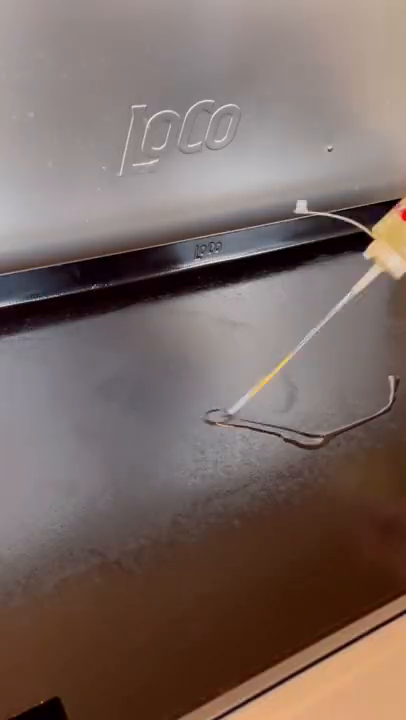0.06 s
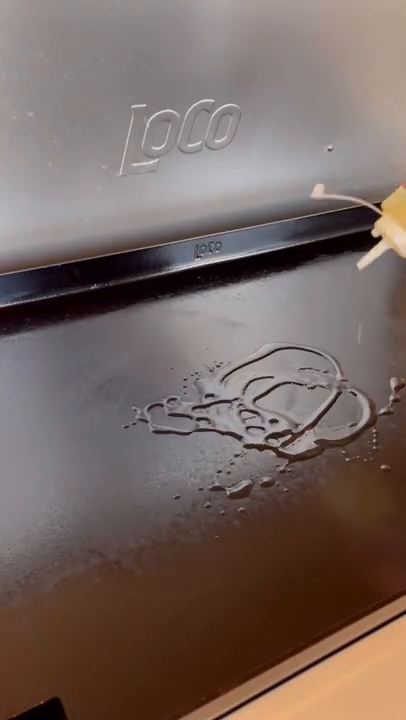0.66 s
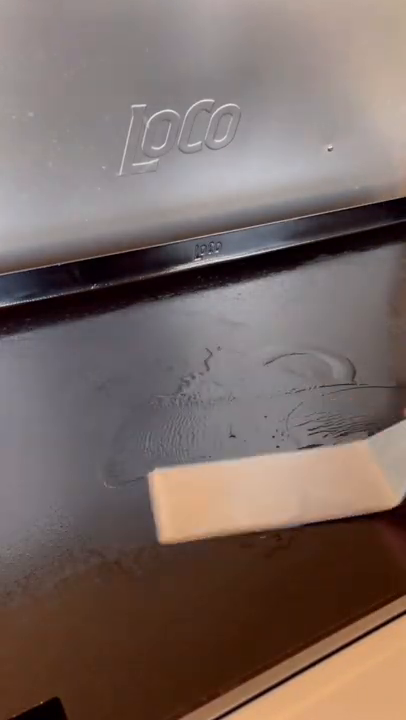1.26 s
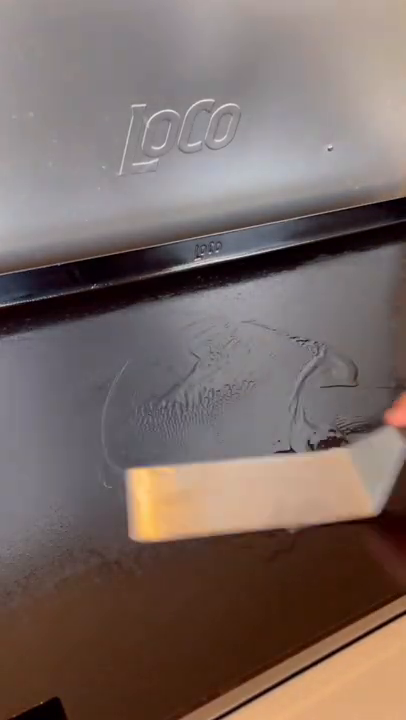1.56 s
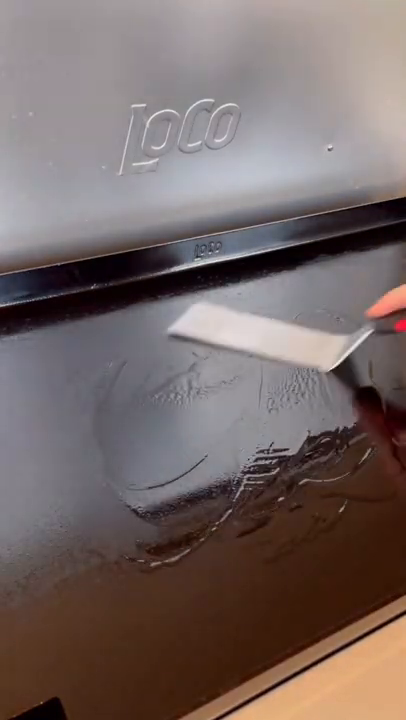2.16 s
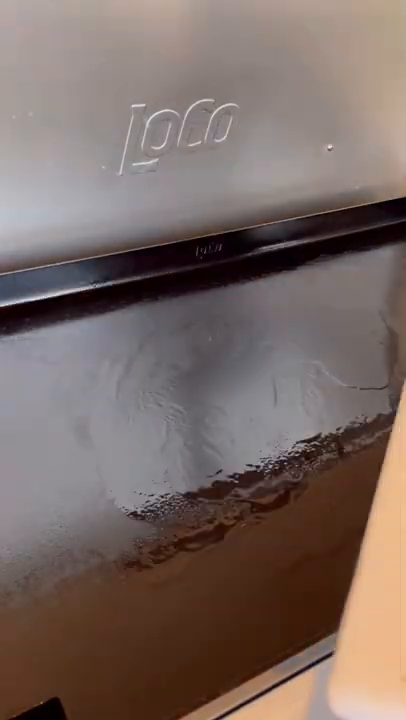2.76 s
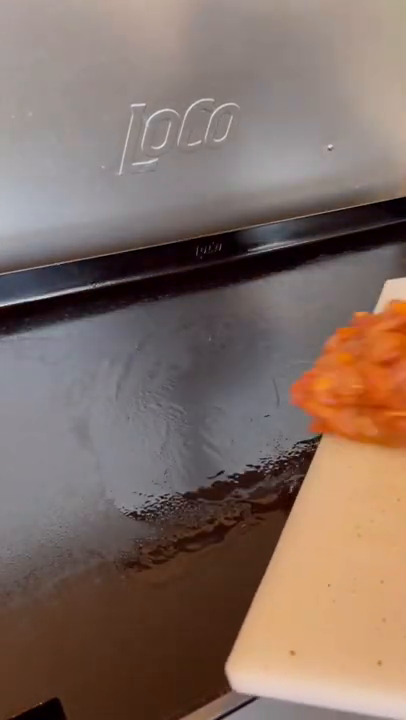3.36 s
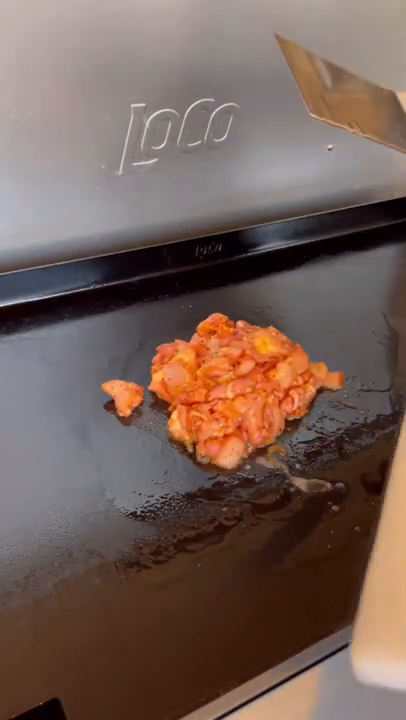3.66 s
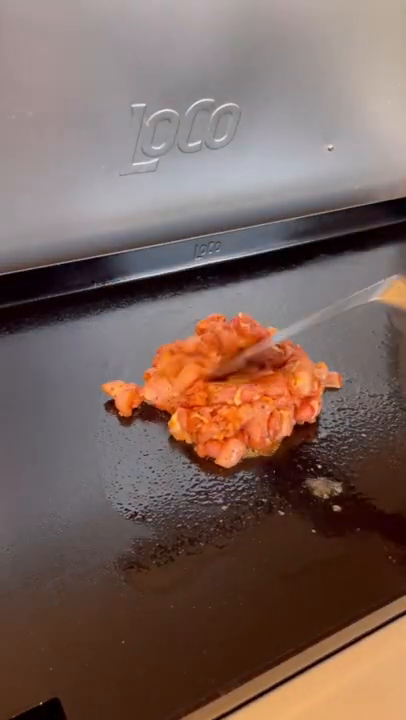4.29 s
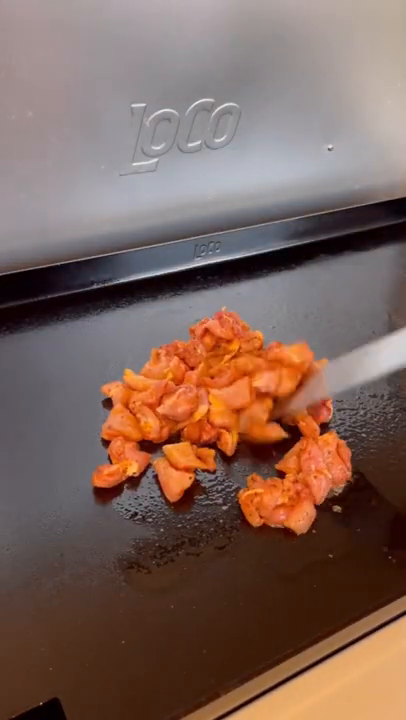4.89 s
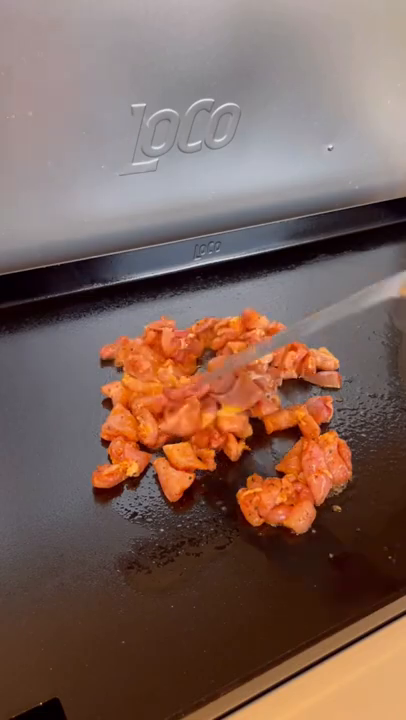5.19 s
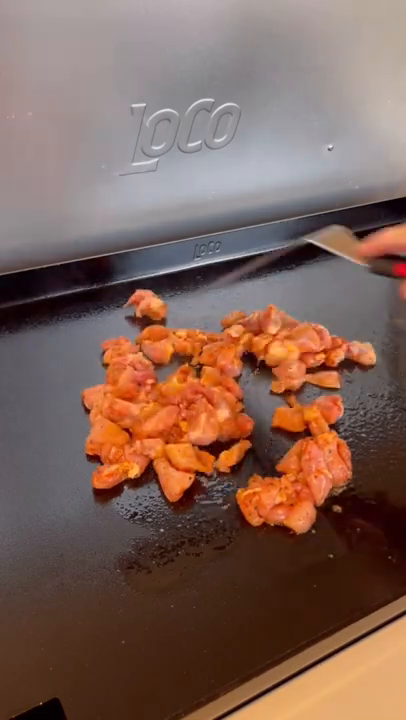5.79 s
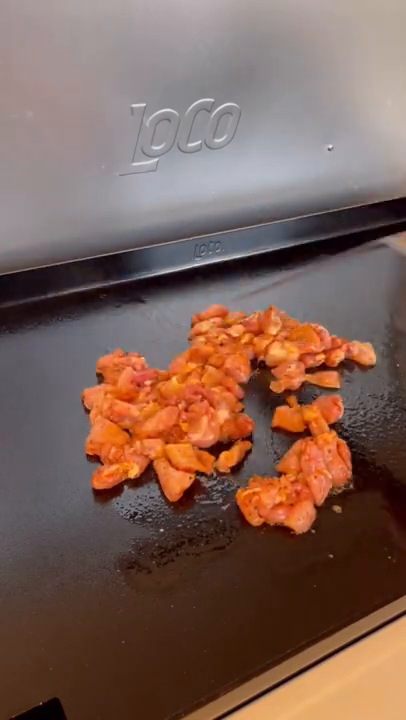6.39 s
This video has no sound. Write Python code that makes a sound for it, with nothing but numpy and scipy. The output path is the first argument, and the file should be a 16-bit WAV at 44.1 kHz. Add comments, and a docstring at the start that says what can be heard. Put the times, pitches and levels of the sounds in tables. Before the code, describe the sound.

The sound is close, at an outdoor steel griddle, with a faint low rumble of air and a distant engine droning until about 2.7 seconds. A squeeze bottle spits at around 0.6 seconds, followed by tiny bubble pops. At 1.1 seconds a metal spatula lands and spreads the oil in rasping, ringing strokes, strongest near 1.3, 1.6, 2.0 and 2.4 seconds. The ringing stops at 2.7 with a dull bump. A scraper taps a plastic cutting board around 3.0 and drags meat across it, ending in a slight squeal and a clink. At 3.5 seconds the chicken meets the hot steel in a loud flare of sizzling, with soft flops as pieces fall. From 4 seconds it settles into a steady, bright, crackling hiss. The scraper chops and clinks against the plate near 4.9, 5.9 and 6.2 seconds, and steam spurts briefly at 5.5. The sizzle eases slightly at the end.

```python
"""Chicken sizzling on an outdoor steel griddle, heard close up on a two-port stereo microphone.
First, with an engine droning far off, a squeeze bottle spits oil and a spatula spreads it in ringing strokes.
The meat is pushed off a cutting board and flares as it meets the steel, then hisses steadily
with bursting steam bubbles while a steel scraper knocks it apart."""
import sys
import numpy as np
from scipy import signal
from scipy.fft import rfft, irfft
from scipy.io import wavfile
from scipy.ndimage import uniform_filter1d

SR = 44100
rng = np.random.default_rng(int(sys.argv[2]) if len(sys.argv) > 2 else 0)


def output_pcm(signal):
    """Save a mono or channel-first signal as 16-bit PCM at the path in sys.argv[1].

    Samples are clipped to [-1, 1] before scaling.
    """
    pcm = np.clip(np.atleast_2d(signal).T, -1, 1) * 32767
    wavfile.write(sys.argv[1], SR, np.round(pcm).astype(np.int16))


N = 284004

FLARE_START_S, FLARE_END_S = 3.445, 3.977  # the heap of meat lands on the steel
# the scraper's edge taps the board: (time [s], board level [dB], blade level [dB], decay [s])
BOARD_TAPS = [(2.9203, -41, -63, 0.0033), (3.002, -27.5, -22.5, 0.0064), (3.295, -29.5, -34, 0.0034),
              (3.4314, -39, -17, 0.012)]


def amp(db):
    """Decibels to gain."""
    return 10 ** (np.asarray(db) / 20)


def unit_rms(x):
    """Scales to rms 1."""
    return x / np.sqrt(np.mean(x ** 2) + 1e-20)


def curve_at(points, hz):
    """Reads a table on a log-frequency axis."""
    f, value = np.transpose(points)
    return np.interp(np.log(hz + 1), np.log(f + 1), value)


def level(rows):
    """Smoothed gain from rows of (time [s], level [dB]), silent outside them."""
    rows, gain = np.array(rows), np.zeros(N)
    span = np.arange(max(int(rows[0, 0] * SR), 0), min(int(rows[-1, 0] * SR), N))
    gain[span] = amp(np.interp(span / SR, rows[:, 0], rows[:, -1]))
    return abs(uniform_filter1d(gain, size=90))


def drift(hz):
    """A random wander of rms 1, mostly slower than hz."""
    knots = np.arange(N) * (2 * hz / SR)
    values = rng.standard_normal(2 ** 13)
    return unit_rms(np.interp(knots, np.arange(len(values)), values))


def grains(per_s, spread_db):
    """Two independent trains of tiny random clicks of unequal size."""
    size, hit = rng.standard_normal((2, N)), rng.random((2, N)) < per_s / SR
    size[hit] *= amp(spread_db * np.minimum(rng.exponential(1, (2, N))[hit], 5))
    return unit_rms(size * hit)


def blows(rows, rise_s):
    """Each contact is a dying burst of chatter: rows of (time [s], level [dB], decay [s])."""
    t, power = np.arange(N) / SR, np.zeros(N)
    for s, db, decay in rows:
        first = round(s * SR)
        age = t[:SR // 2][:N - first]
        burst = amp(db) * (1 - np.exp(-age / rise_s)) * np.exp(-age / decay)
        power[first:first + len(age)] += burst ** 2
    return np.sqrt(power) * rng.choice([-1, 1], (2, N))


def swell(s, rise_s, hold_s, fade_db_per_s, turn_db=0):
    """Attack, hold and release of one contact, peak 1; it may slacken in the middle of the hold."""
    gain, first = np.zeros(N), round(s * SR)
    age = np.arange(min(SR, N - first)) / SR
    held = age - rise_s
    slack = np.sin(np.pi * np.clip(held / hold_s, 0, 1)) ** 2
    release_db = fade_db_per_s * np.maximum(held - hold_s, 0)
    gain[first:first + len(age)] = np.minimum(age / rise_s, 1) * amp(turn_db * slack - release_db)
    return gain


def convolve(x, taps):
    """Passes both channels through a response scaled to unit energy."""
    return signal.fftconvolve(np.float32(x), np.float32(taps / np.linalg.norm(taps[0])), axes=1)[:, :N]


def body(x, spectrum, modes=(), between_db=0):
    """Causal filter of unit energy: a broad colour, with resonances above the level between them."""
    hz = abs(np.fft.fftfreq(2 ** 14, 1 / SR))
    peaks = sum(amp(db) ** 2 / (1 + (2 * (hz - f) / width) ** 2) for f, width, db in modes)
    low_cut = (hz ** 2 / (hz ** 2 + (spectrum[0][0] / 2) ** 2)) ** 2
    gain = amp(curve_at(spectrum, hz)) * np.sqrt(amp(between_db) ** 2 + peaks) * low_cut + 1e-5
    minimum_phase = np.exp(signal.hilbert(np.log(gain)).conj())
    taps = np.fft.ifft(minimum_phase).real[:2 ** 13]
    return convolve(x, taps[None])


def ring(x, t60):
    """The crowd of modes of a steel sheet: a dense dying tail."""
    t = np.arange(SR // 2) / SR
    return convolve(x, rng.standard_normal((2, len(t))) * amp(-60 * t / t60))


def open_air():
    """The low rumble of the outdoors, sinking partway through."""
    # colour of the air: (frequency [Hz], level [dB])
    colour = [(30, -28.5), (50, -18), (80, -5.5), (170, -3), (260, -7), (400, -18.5), (700, -23),
              (1300, -27), (2500, -38), (4000, -42), (6000, -54.5), (15000, -58.5)]
    sink_start_s, sink_length_s = 2.27, 1.65
    sunk = np.clip((np.arange(N) / SR - sink_start_s) / sink_length_s, 0, 1)
    return body(rng.standard_normal((2, N)), colour) * amp(-50 - 11 * sunk)


def drone(orders, span_s, shaft_hz, sag_hz_per_s, db, fade_db_per_s, waver_db, dulling_db_per_s=0):
    """Only a few shaft orders carry this far, each wavering on the way; speed and level sag slowly."""
    start, end = span_s
    age = np.clip(np.arange(N) / SR - start, 0, end - start)
    turns = np.cumsum(shaft_hz - sag_hz_per_s * age) / SR
    tone = np.zeros(N)
    for order, order_db in orders:
        dulling_db = dulling_db_per_s * (order - orders[0][0]) * age  # higher orders fade faster
        gain = amp(order_db + waver_db * drift(8.1) - dulling_db)
        tone += gain * np.sin(2 * np.pi * (order * turns + rng.random()))
    return level([(start, db), (end, db - fade_db_per_s * (end - start))]) * tone


def far_engine():
    """A distant engine drones: one set of partials at first, a higher set from 0.93 s; near the end a hum
    swells and rises."""
    # partials at each speed: (shaft order, level [dB])
    slow_orders = [(2.5, -5.5), (4, 2), (5.5, -27), (6.5, -3.5), (16, -19.5)]
    fast_orders = [(4, 0), (6, -16), (7, -1.5)]
    # the brief hum: (time [s], half-width [s], pitch [Hz], rise [Hz/s], level [dB])
    hum_swell = (2.365, .06, 274, 180, -39)
    slow = drone(slow_orders, span_s=(0, .93), shaft_hz=31.86, sag_hz_per_s=0.38,
                 db=-44, fade_db_per_s=.5, waver_db=1.0)
    fast = drone(fast_orders, span_s=(.93, 2.7), shaft_hz=41.1, sag_hz_per_s=1.063,
                 db=-41.5, fade_db_per_s=2, waver_db=1.7, dulling_db_per_s=1)
    s, width, hz, rise, db = hum_swell
    t = np.arange(N) / SR - s
    hum = amp(db) * np.exp(-(t / width) ** 2) * np.sin(2 * np.pi * (hz + rise * t / 2) * t)
    return slow + fast + hum


def oil_bottle():
    """The emptying bottle spits air, and small bubbles pop with a rising pitch."""
    # spits of air: (time [s], level [dB], decay [s])
    spits = [(.122, -56, .005), (.24, -54.5, 0.0073), (.586, -43, 0.0084), (.621, -46, 0.005),
             (.6415, -18, 0.0048)]
    # their colour: (frequency [Hz], level [dB])
    spit_colour = [(400, -6.5), (700, -15), (1100, 3.5), (1700, -11), (2500, -14), (3700, -8),
                   (6000, -32.5), (9500, -6), (13000, -45), (15500, -19)]
    # bubbles at the nozzle: (time [s], level [dB], pitch [Hz])
    bubbles = [(0.564, -39, 4450), (0.726, -31, 2080), (0.8108, -41, 3630), (0.869, -45, 3450)]
    out = amp(-2) * body(blows(spits, rise_s=0.00024), spit_colour)
    t = np.arange(SR // 30) / SR
    for s, db, hz in bubbles:
        pop = amp(db + 3.5) * (1 - np.exp(-t / 0.00026)) * np.exp(-t / 0.0013)
        chirp = np.sin(2 * np.pi * hz * t * (1 + 7 * t))
        splash = 0.16 * signal.lfilter([.5], [1, -.7], rng.standard_normal(len(t)))
        out[:, round(s * SR):][:, :len(t)] += pop * (chirp + splash)
    return out + amp(-7.5) * ring(out, t60=0.14)


def board_slide():
    """The scraper drags meat over the plastic board, its edge squealing towards the end."""
    # the push: (time [s], friction [dB])
    push = [(2.93, -54), (3.2, -56), (3.29, -45), (3.34, -33.5), (3.44, -41.5), (3.48, -70)]
    # colour of the slide: (frequency [Hz], level [dB])
    colour = [(200, -0.5), (400, -5), (800, 0), (1700, -4), (2500, -3), (3500, -2), (5000, -5),
              (6500, -11.5), (10000, -10.5), (15500, -12.5)]
    # resonances of the board and the edge: (frequency [Hz], width [Hz], level [dB])
    board_modes = [(868, 36, 2.5), (1354, 70, 1), (1727, 56, 3), (3300, 100, -7), (3840, 74, 0.5),
                   (4060, 54, -11), (5340, 52, -3)]
    edge_modes = [(4780, 50, -1), (5030, 50, 1)]
    squeal_peak_s, squeal_width_s = 3.405, .1
    drag = unit_rms(grains(per_s=5100, spread_db=1) * amp(3.2 * drift(60))) * level(push)
    taps = blows([(s, db, decay) for s, db, _, decay in BOARD_TAPS], rise_s=0.0004)
    slide = amp(2.5) * body(drag + taps, colour, board_modes, between_db=-6.5)
    skid = amp(2) * np.exp(-((np.arange(N) / SR - squeal_peak_s) / squeal_width_s) ** 2)
    squeal = body(drag * skid, [(2500, -28), (5000, -6), (9000, -11)], edge_modes, between_db=-40)
    return slide + squeal


def board_bumps():
    """The board and the table bump dully and jostle."""
    # bumps: (time [s], level [dB], decay [s])
    thuds = [(2.704, -14.5, 0.0048), (2.807, -34, 0.015), (2.999, -23, 0.043), (6.174, -26, 0.014)]
    # spells of soft jostling: (time [s], hold [s], level [dB])
    jostles = [(2.945, 0.2, -38.5), (5.183, 0.17, -46.5), (6.128, 0.074, -40.5)]
    # low colour of both: (frequency [Hz], level [dB])
    low_colour = [(30, -21), (55, -16), (90, 2), (170, 3), (260, -7.5), (400, -15), (700, -28)]
    spells = sum(amp(db) * swell(s, rise_s=0.0094, hold_s=hold, fade_db_per_s=450)
                 for s, hold, db in jostles)
    jostle = spells * unit_rms(rng.standard_normal((2, N)) * amp(3.7 * drift(45)))
    return amp(-3.5) * body(blows(thuds, rise_s=0.00041) + jostle, low_colour + [(1300, -27), (6000, -58)])


def falling_meat():
    """Pieces flop onto the steel, with smaller ones tumbling in between."""
    # the larger pieces: (time [s], level [dB], decay [s])
    slaps = [(3.649, -30.5, 0.013), (3.792, -28.5, 0.0071), (3.891, -27.5, 0.0076), (3.919, -31.5, 0.011),
             (4.057, -34.5, 0.016), (4.699, -40.5, .018)]
    # colour of a slap: (frequency [Hz], level [dB])
    colour = [(90, 0), (160, 6.5), (260, -3), (480, -5.5), (800, -13.5), (3000, -27)]
    patter = grains(per_s=49, spread_db=2.5) * level([(FLARE_START_S, -51), (FLARE_END_S, -51)])
    return amp(-0.5) * body(blows(slaps, rise_s=0.00065) + patter, colour)


def scraper():
    """Chops through the meat ring the loaded plate low down, while the thin blade clinks above."""
    # chops and skids: (time [s], plate level [dB], blade level [dB], decay [s])
    strikes = [(4.7, -37.5, -33, 0.032), (4.85, -24, -20, 0.027), (5.105, -39.5, -26, .025),
               (5.888, -25.5, -17.5, 0.026), (5.925, -31, -16, .02), (6.196, -26, -17, 0.019),
               (6.231, -39, -13, 0.014)]
    # colours of plate and blade: (frequency [Hz], level [dB])
    chop_colour = [(100, -11), (220, -3.5), (1000, 7), (1900, 2), (2900, 1), (4500, -33), (9000, -54)]
    clink_colour = [(500, -20), (1500, -0.5), (3400, 1), (6000, 0.5), (11000, 5.5), (15500, 13.5)]
    # their modes: (frequency [Hz], width [Hz], level [dB])
    loaded_plate_modes = [(221, 50, 3), (479, 30, 4), (705, 30, -10), (905, 30, -2), (972, 30, -2),
                          (1030, 30, -4), (1690, 40, -3), (1790, 50, -2), (1884, 28, 7.5), (2730, 160, -3),
                          (2850, 30, 1)]
    blade_modes = [(2850, 95, 1), (3420, 50, 10), (3960, 150, -4), (4620, 51, 4), (5220, 50, 3),
                   (6880, 30, 2), (9050, 63, 3), (10800, 110, -3)]
    # the lifted blade sings faintly: (time [s], level [dB], pitch [Hz], decay [s])
    blade_note = (2.707, -58, 3380, .035)
    on_plate = blows([(s, db, decay) for s, db, _, decay in strikes], rise_s=0.0012)
    on_blade = blows([(s, db, decay) for s, _, db, decay in BOARD_TAPS + strikes], rise_s=0.0001)
    chops = amp(-2.5) * body(on_plate, chop_colour, loaded_plate_modes, between_db=-16)
    clinks = amp(-1.5) * body(on_blade, clink_colour, blade_modes, between_db=-15)
    s, db, hz, decay = blade_note
    age = np.maximum(np.arange(N) / SR - s, 0)
    singing = amp(db) * np.exp(-age / decay) * np.sin(2 * np.pi * hz * age)
    return chops + amp(-1) * ring(chops, t60=0.58) + clinks + amp(-7) * ring(clinks, t60=.25) + singing


def travelling_contact(x, patchy_db):
    """As the contact point travels along the edge, resonances swell and fade in patches."""
    spectra = signal.stft(x, nperseg=1024)[2]
    patches = uniform_filter1d(rng.standard_normal(spectra.shape[1:]), size=5, axis=0)
    patches = unit_rms(uniform_filter1d(patches, size=4, axis=1))
    return signal.istft(spectra * unit_rms(amp(patchy_db * patches)), nperseg=1024)[1][:, :N]


def spatula_forces():
    """Friction at the spatula's edge and the push on the plate, from skims and pressed strokes."""
    # light skims over the oil: (time [s], hold [s], friction [dB])
    skims = [(1.058, 0.04, -36.5), (1.183, 0.0062, -33), (1.223, 0.019, -33), (1.413, 0.016, -40),
             (1.496, 0.0084, -47), (1.838, 0.079, -44.5), (2.338, 0.0055, -44.5), (2.367, 0.021, -36)]
    # pressed strokes: (time [s], rise [s], hold [s], friction [dB], plate level [dB], release [dB/s])
    strokes = [(1.253, 0.015, 0.0036, -18.5, -32.5, 128), (1.555, 0.043, 0.093, -22, -34, 323),
               (1.933, 0.028, .088, -24, -37.5, 355), (2.164, 0.027, 0.028, -44, -58.5, 112),
               (2.413, 0.013, 0.0027, -27, -37.5, 351), (2.596, 0.025, 0.029, -40, -40, 333)]
    friction = sum(amp(db) * swell(s, rise_s=0.0046, hold_s=hold, fade_db_per_s=650)
                   for s, hold, db in skims)
    push = amp(-6.5) * friction
    for s, rise, hold, db, plate_db, fade in strokes:
        stroke = swell(s, rise, hold, fade, turn_db=-57 * hold)  # longer strokes slacken more at the turn
        friction += amp(db) * stroke
        push += amp(plate_db) * stroke ** 0.54
    return friction, push


def spatula():
    """The edge catches and slips on oiled steel; pressing wakes the blade's modes, the plate rings on."""
    # the spatula lands on the plate: (time [s], level [dB], decay [s])
    landings = [(1.057, -17, 0.0072), (1.067, -14.5, 0.0088)]
    # colours of the rasp, oil film, bare plate and landing: (frequency [Hz], level [dB])
    rasp_colour = [(300, -54.5), (800, -42), (1600, -11), (2100, -5.5), (2700, 4.5), (4000, -0.5),
                   (5500, -2.5), (7500, 2.5), (10000, 5), (12500, 1), (15500, -6)]
    film_colour = [(2000, -36.5), (4500, -3.5), (7500, -4.5), (11000, -1.5), (15500, -2)]
    plate_colour = [(200, 3), (300, -2), (560, -2), (770, 1), (1000, 2), (1800, 2.5), (2600, -4),
                    (4500, -13), (8000, -39), (15000, -60)]
    landing_colour = [(120, 1.5), (240, 0), (550, -1.5), (770, -3), (1000, 2), (1900, -7.5), (2400, -16),
                      (6000, -20), (15000, -22)]
    # modes of the blade and the bare plate: (frequency [Hz], width [Hz], level [dB])
    blade_modes = [(1995, 110, -2.5), (2440, 25, -1.5), (3086, 39, -1), (3660, 17, 5.5), (3960, 140, -0.5),
                   (4735, 91, 1.5), (5210, 49, 5), (5760, 72, 4.5), (6520, 71, -4.5), (6800, 50, -13.5),
                   (7260, 81, -0.5), (8750, 110, -7)]
    plate_modes = [(245, 16, 2), (285, 10, 4), (438, 14, -4), (495, 12, 2), (549, 12, -1), (577, 10, 3),
                   (977, 16, -0.5), (1160, 14, 2), (1240, 20, -4), (1360, 20, -2), (1604, 14, 0),
                   (1680, 20, -2), (1894, 20, -2), (2094, 14, -2)]
    end_s = 2.707  # the ringing stops short
    friction, push = spatula_forces()
    pressure = friction / amp(-19.5)
    slips = unit_rms(grains(per_s=13000, spread_db=4.5) * amp(0.3 * drift(130)))
    rasp = amp(3) * body(slips * friction * pressure ** 0.35, rasp_colour, blade_modes, between_db=-13)
    fine_hiss = grains(per_s=6600, spread_db=0) * amp(5.4 * drift(70))
    film = amp(-0.5) * body(fine_hiss * friction / (1.21 + pressure), film_colour)
    scrape = travelling_contact(rasp + film, patchy_db=3.0)
    shake = body(slips * push, plate_colour, plate_modes, between_db=-6.0)
    landing = amp(-1) * body(blows(landings, rise_s=0.0023), landing_colour, plate_modes, between_db=-15.5)
    spreading = scrape + landing + amp(-18.5) * shake + amp(0.5) * ring(shake + landing, t60=0.53)
    return spreading * (np.arange(N) < end_s * SR)


def flare():
    """Wet meat meets hot steel: the sizzle flares, sags and breaks off."""
    # colour of the flare: (frequency [Hz], level [dB])
    colour = [(150, -10), (300, -14.5), (600, -16), (1000, -12), (1700, -9.5), (2500, -7.5), (3500, -5.5),
              (5200, 0), (7500, -3.5), (10000, -5.5), (12500, -2.5), (15500, -4.5)]
    rise_s, start_db, sag_db_per_s = 0.099, -17.5, 13.5
    contact = np.clip((np.arange(N) / SR - FLARE_START_S) / rise_s, 0, 1)
    end_db = start_db - sag_db_per_s * (FLARE_END_S - FLARE_START_S)
    boiling = contact * level([(FLARE_START_S, start_db), (FLARE_END_S, end_db)])
    return body(grains(per_s=22000, spread_db=1) * amp(0.61 * drift(49)), colour) * boiling


def sizzle():
    """Thousands of steam bubbles burst each second in the oil; a few snap louder than the rest."""
    # the steady sizzle swells gently, holds, then steps down near the end: (time [s], level [dB])
    sizzle_level = [(3.93, -32), (4.2, -29.5), (4.7, -27.5), (5.5, -27), (6.24, -29), (6.3, -32.5),
                    (6.44, -33)]
    # its colour: (frequency [Hz], level [dB])
    colour = [(60, -33), (120, -17), (280, -8), (380, -19.5), (480, -17.5), (800, -22), (1300, -12.5),
              (2200, -13), (3300, -7), (5000, -0.5), (7500, -2.5), (10000, -1.5), (12500, 0.5), (15500, 1)]
    # steam spurts from under the meat: (time [s], level [dB], decay [s])
    spurts = [(5.456, -23.5, .014), (5.495, -22.5, 0.028)]
    snaps = amp(-15) * grains(per_s=200, spread_db=2.5)
    bursts = grains(per_s=26000, spread_db=0.34) * amp(0.3 * drift(50) + .55 * drift(7))
    return amp(3) * body((bursts + snaps) * level(sizzle_level) + blows(spurts, rise_s=0.0022), colour)


def scene():
    """All sources reach two microphone ports that agree in the bass and part in bands of the treble."""
    # agreement of the ports: (frequency [Hz], likeness [0-1])
    port_likeness = [(300, .99), (700, .97), (1100, .92), (1400, .68), (2000, .9), (2800, .998),
                     (4600, .998), (5400, .76), (8800, .7), (9700, .97), (10400, .7), (11100, .998),
                     (12900, .998), (13900, .72), (16000, .68)]
    # the right port trails the left: (frequency [Hz], lag [rad])
    right_lag = [(4600, 0), (5300, .5), (7800, .45), (8900, 1.6), (9700, 3.2), (11100, 6.28), (13100, 6.28),
                 (15800, 8.8)]
    mix = open_air() + far_engine() + oil_bottle() + spatula()
    mix = mix + board_slide() + board_bumps() + falling_meat() + scraper() + flare() + sizzle()
    shared, apart = rfft(mix)
    hz = np.fft.rfftfreq(N, 1 / SR)
    likeness = np.clip(curve_at(port_likeness, hz), 0, 1)
    shared, apart = shared * np.sqrt((1 + likeness) / 2), apart * np.sqrt((1 - likeness) / 2)
    left = shared + 1j * apart
    right = (shared - 1j * apart) * np.exp(-1j * curve_at(right_lag, hz))
    return irfft(np.array([left, right]), N)


def record(dry):
    """The recorder's band limit."""
    low_pass = signal.firwin(511, cutoff=15850, window=("kaiser", 9), fs=SR)
    return signal.oaconvolve(dry, low_pass[None], "same")


dry = scene()
out = record(dry)
output_pcm(out)
```